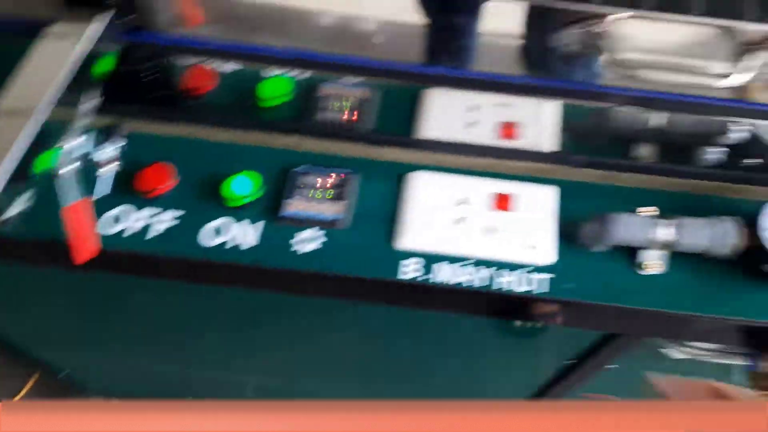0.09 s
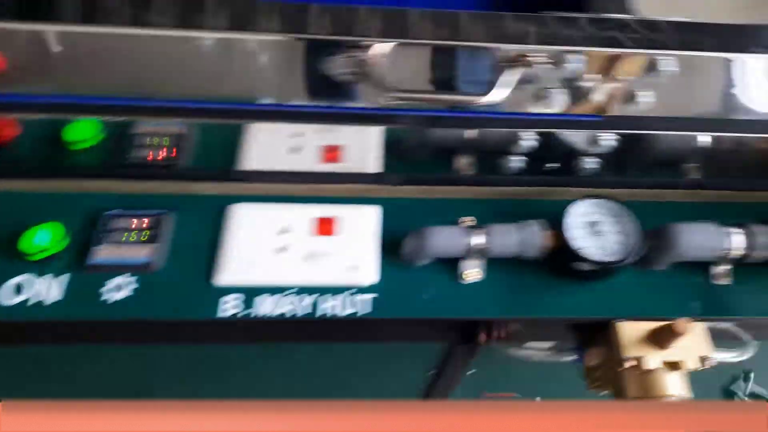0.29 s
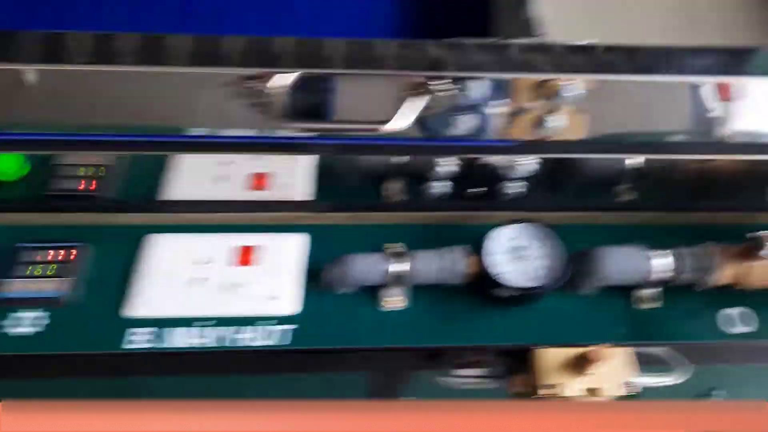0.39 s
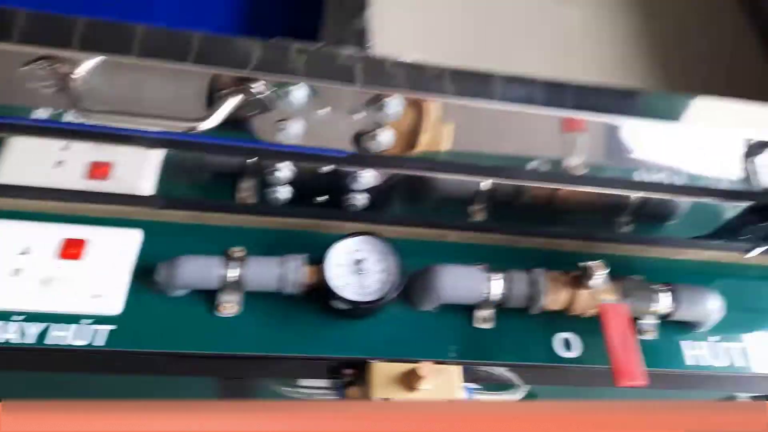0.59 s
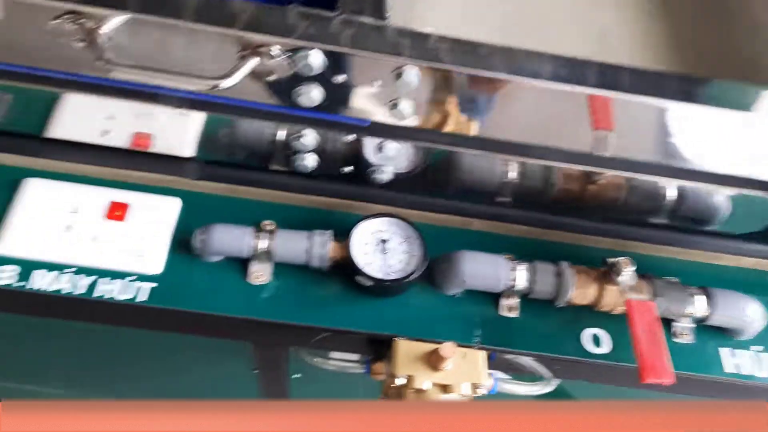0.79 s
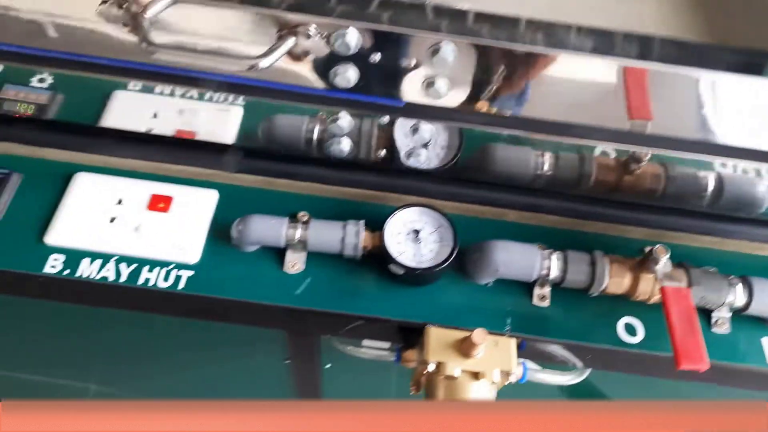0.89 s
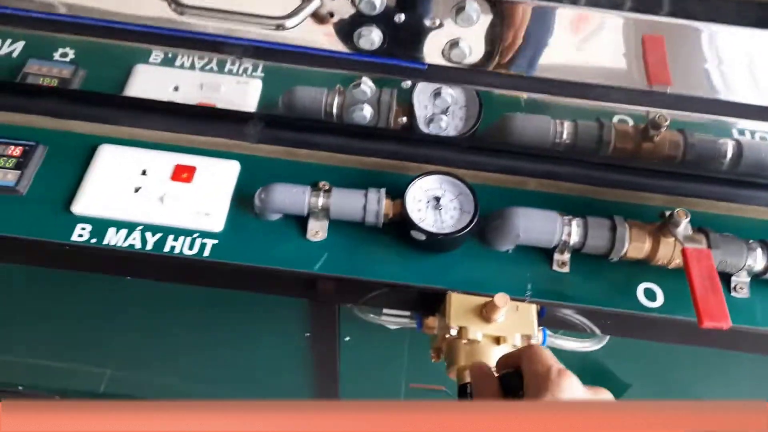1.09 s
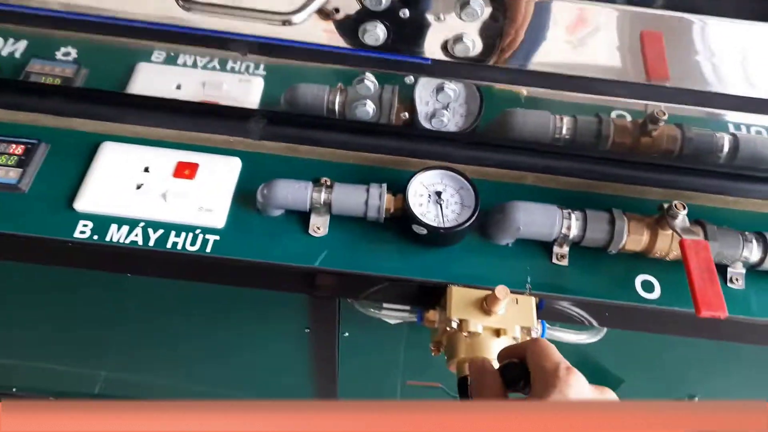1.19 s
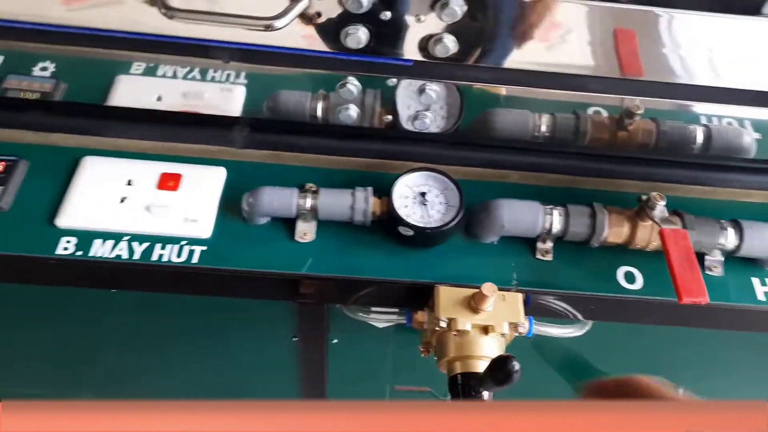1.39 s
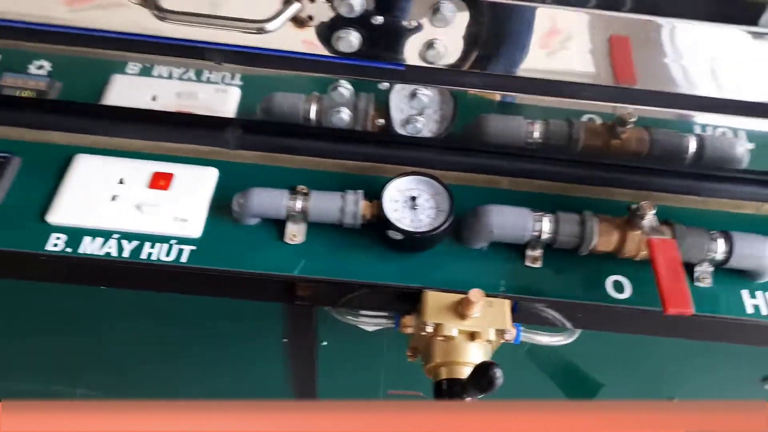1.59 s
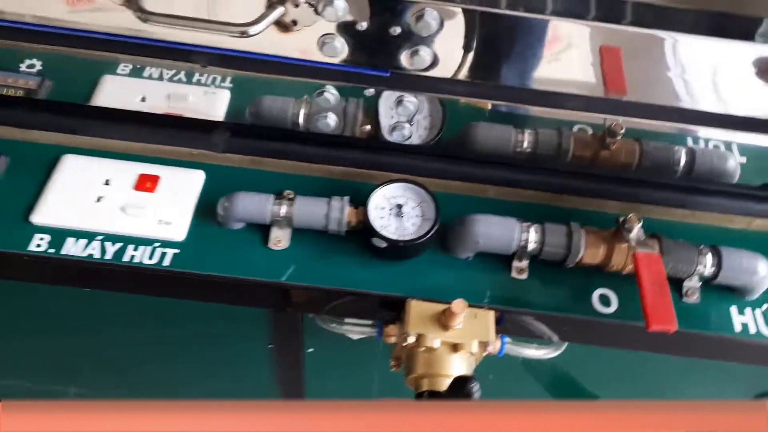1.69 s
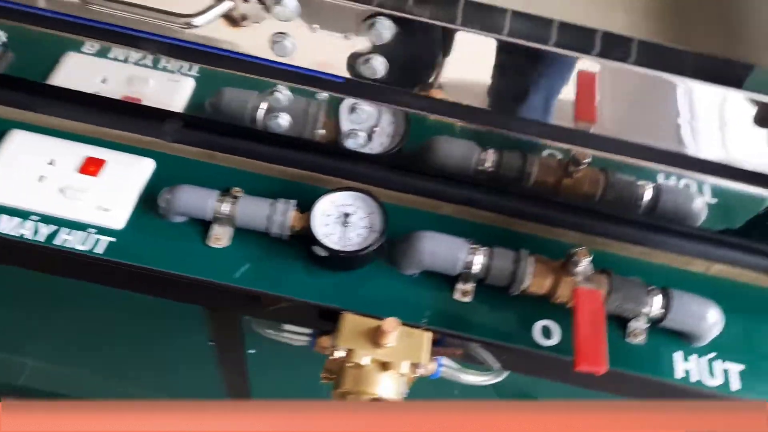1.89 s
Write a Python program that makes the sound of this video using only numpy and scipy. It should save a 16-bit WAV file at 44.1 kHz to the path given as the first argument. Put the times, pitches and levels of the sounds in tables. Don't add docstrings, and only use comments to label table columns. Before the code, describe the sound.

A compressed air blast from a brass valve in a workshop with distant machine rumble. A lever knocks at 0.2 s; air bursts out at 0.25 s with a sharp hiss, then a wide, gusty roar with low hollow howl buffeting the close stereo microphone. It sharpens and stops near 1.0 s. The hall rings away, with a click at 1.08, softer clicks around 1.37 and faint sleeve rustle around 1.6.

```python
import sys
import numpy as np
from scipy import signal
from scipy.fft import rfft, irfft, next_fast_len
from scipy.io import wavfile
from scipy.ndimage import uniform_filter1d

SR = 44100
rng = np.random.default_rng(int(sys.argv[2]) if len(sys.argv) > 2 else 0)


def int16_out(signal):
    q = np.round(np.clip(np.atleast_2d(signal).T, -1, 1) * 32767)
    wavfile.write(sys.argv[1], SR, q.astype(np.int16))


def voltage_ratio(level):
    return 10 ** (np.asarray(level, float) / 20)


N = 83790
TIME = np.arange(N) / SR
SIZE = next_fast_len(N)
OPEN_S, SHUT_S = 0.2478, 0.97


def rms_one(x):
    return x / np.sqrt(np.mean(x ** 2) + 1e-20)


def at_hz(points, hz):
    table = np.array(points)
    return np.interp(np.log(hz), np.log(table[:, 0]), table[:, 1])


def over_time(seconds, db):
    return voltage_ratio(np.interp(TIME, seconds, db, left=-120, right=-120))


def drift(rate_hz, channels):
    hold = 70
    r = np.exp(-2 * np.pi * rate_hz * hold / SR)
    chance = rng.standard_normal((channels, N // hold + 501))
    slow = signal.lfilter([1], [1, -2 * r, r * r], chance)[:, 500:]
    slow = slow / slow.std(axis=1, keepdims=True)
    return uniform_filter1d(np.repeat(slow, hold, axis=1), size=hold)[:, :N]


def bell(x, hz, width_hz, db):
    r, w = np.exp(-np.pi * width_hz / SR), 2 * np.pi * hz / SR
    peak = signal.lfilter([(1 - r * r) / 2, 0, (r * r - 1) / 2], [1, -2 * r * np.cos(w), r * r], x)
    return x + (voltage_ratio(db) - 1) * peak


OCTAVES = 120 * 2 ** np.arange(0, 8.)


def bands(colour, balance, likeness, shape=None):
    f = np.arange(SIZE // 2 + 1) * SR / SIZE + 1
    mid, side = rfft(rng.standard_normal((2, SIZE))) * voltage_ratio(at_hz(colour, f))
    alike = np.clip(at_hz(likeness, f), -.99, .99)
    lean = at_hz(balance, f) / 2
    pair = np.sqrt(1 + alike) * mid + np.sqrt(1 - alike) * side * [[1], [-1]]
    pair = pair * voltage_ratio([lean, -lean])
    pair = pair * SIZE / np.sqrt(np.sum(np.abs(pair) ** 2))
    if shape is None:
        return irfft(pair, SIZE)[:, :N]
    out = np.zeros((2, N))
    for hz in OCTAVES:
        low, high = hz / 2, hz * 2
        ends = [low < 70, 1, high > 25000]
        share = np.interp(np.log(f), np.log([low, hz, high]), ends)
        out += irfft(pair * share, SIZE)[:, :N] * shape(hz)
    return out


# frequency in Hz, level in dB per Hz.
SHOP_COLOUR = [(30, -7), (140, 1), (205, -18), (311, -5), (608, -16.5), (2260, -22.5), (11000, -46.5),
               (15500, -60)]
# frequency in Hz, left minus right in dB.
AIR_BALANCE = [(60, 2.7), (290, -0.5), (640, 3), (1900, 9.5), (4400, 2.5), (6500, 0.6), (8500, 5.5),
               (15000, 7.5)]
# frequency in Hz, likeness (1 is identical).
AIR_LIKENESS = [(60, 0.99), (240, 0.98), (950, 0.13), (3770, 0.027), (15000, 0.039)]


def shop():
    sway = lambda hz: voltage_ratio(1.7 * drift(8.5, channels=1))
    return voltage_ratio(-40.5) * bands(SHOP_COLOUR, AIR_BALANCE, AIR_LIKENESS, sway)


# middle in seconds, width in seconds, level in dB.
RUSTLES = [
    (.11, .04, -61.5),
    (1.47, 0.044, -65),
    (1.63, .06, -54),
    (1.72, 0.037, -60),
    (1.8, .03, -64),
]


def sleeve():
    swell = sum(voltage_ratio(db) * np.exp(-((TIME - s) / width) ** 2) for s, width, db in RUSTLES)
    cloth = [(3000, -13), (8000, 1), (13000, -4), (16000, -9.5)]   # Hz, dB per Hz
    return swell * bands(cloth, AIR_BALANCE, AIR_LIKENESS) * voltage_ratio(1.5 * drift(30, channels=1))


# start in seconds, level in dB, strongest frequency in Hz, fall in dB per octave away from it.
KNOCKS = [(.2050, -13.5, 2230, 8.5), (.2075, -13.5, 560, 11.5), (.2105, -19.5, 2540, 1.1),
          (.2135, -20.5, 386, 1.5), (0.222, -29, 428, 0), (1.0794, -14, 10000, 6), (1.082, -15, 3000, 5),
          (1.087, -24, 1700, 8), (1.088, -27, 350, 5), (1.358, -30, 1600, 12.0), (1.366, -32, 1454, 9),
          (1.369, -30, 3400, 11), (1.376, -38, 1500, 15.5), (1.39, -32, 1100, 8.0)]
# frequency in Hz, level in dB, seconds to fade by 60 dB.
BODY = [(300, -8.5, 0.04), (378.4, -6.5, 0.062), (460, -1.5, 0.076), (650, -13, .03), (810, -7.5, 0.046),
        (1000, -9.5, .03), (1190, -11.5, .03), (1400, -10.5, 0.029), (1575, -7.5, 0.023), (1922, -9, 0.09),
        (2200, -2, 0.005), (2584, -10.5, 0.014), (3400, -13, .006), (4580, -16, .004)]


def lever():
    crack_db, crack_s = -10.5, .03
    tail_db, tail_s = -1.5, 0.17
    at = np.array([int(row[0] * SR) for row in KNOCKS])
    luck_db = rng.normal(0, 1.5, (len(KNOCKS), len(BODY)))

    def strength(hz):
        return np.array([db - fall_db * abs(np.log2(hz / top_hz)) for s, db, top_hz, fall_db in KNOCKS])

    ring = np.zeros((2, N))
    for k, (hz, level_db, t60) in enumerate(BODY):
        clicks = np.full(N, 1e-18)
        clicks[at] += voltage_ratio(strength(hz) + level_db + luck_db[:, k])
        r, w = voltage_ratio(-60 / (t60 * SR)), 2 * np.pi * hz / SR
        lean = at_hz(AIR_BALANCE, hz) / 2
        tone = signal.lfilter([0, np.sin(w)], [1, -2 * r * np.cos(w), r * r], clicks)
        ring += (-1) ** k * tone * voltage_ratio([[lean], [-lean]])

    lag = TIME[:SR // 3]
    scatter = rms_one(rng.standard_normal((2, len(lag))))
    scatter = scatter * voltage_ratio(tail_db - 27 - 60 * lag / tail_s) * (lag > .002)

    clicks = np.full(N, 1e-18)
    clicks[at] += voltage_ratio(strength(9000) + crack_db)
    crack = signal.lfilter([1], [1, -voltage_ratio(-60 / (crack_s * SR))], clicks)
    crack_colour = [(2000, -16.5), (4500, -2.5), (9000, -6), (15000, -7.5)]   # Hz, dB per Hz
    crack = crack * bands(crack_colour, AIR_BALANCE, AIR_LIKENESS)
    return ring + crack + signal.fftconvolve(ring, scatter, axes=1)[:, :N]


# time in seconds, level in
# dB.
NOZZLE = [
    (.236, -46),
    (.2422, -31),
    (.2436, -14.5),
    (.256, -8),
    (.27, -17),
    (.9, -19.5),
    (.966, 0.5),
    (.984, -4),
    (1.01, -47),
]
# frequency in Hz, level in dB per Hz.
NOZZLE_COLOUR = [(1500, -25), (4000, -6.5), (5800, 3), (6700, -8.5), (7500, -3), (9500, -5), (14000, -18),
                 (16000, -12)]
# frequency in Hz, left minus right in dB.
JET_BALANCE = [(60, -5), (380, -1.5), (2380, 0.5), (15000, 0)]


def nozzle():
    hiss = bands(NOZZLE_COLOUR, JET_BALANCE, [(100, 0.0031), (9000, 0.0053)])
    return hiss * voltage_ratio(0.59 * drift(36, channels=1)) * over_time(*np.transpose(NOZZLE))


# time in seconds, turbulence in dB, cavity howl in dB.
BLAST = [
    (.243, -29, -26),
    (.26, 0, -12),
    (.33, 5.5, -7),
    (.475, 6.5, -2),
    (.6, 3.5, -10),
    (.9, 4, -6),
    (0.949, 2.5, 2),
    (0.969, 0, -9),
    (1.0, -26, -44),
]
# frequency in Hz, level in dB per Hz.
BLAST_COLOUR = [(20, -35.5), (60, -3.5), (330, -5), (616, -4.5), (5900, -12.5), (8900, -16.5), (13500, -10),
                (16000, -15)]
# frequency in Hz, width in Hz, change in dB.
PORT_NOTCH = [(8550, 2000, -14), (10080, 2800, -12.5)]
SKEW = [
    [.06],
    [-.04],
]


def blast():
    seconds, db, howl_db = np.transpose(BLAST)
    gust = drift(4.16, channels=2)

    def lumpy(hz):
        depth = np.clip(700 / hz, .3, 1)
        return voltage_ratio(depth * (1.7 * gust + 2.4 * drift(25, channels=2)))

    rush = bands(BLAST_COLOUR, JET_BALANCE, [(100, 0.0008), (9000, 0.003)], lumpy)
    rush = rush - np.array(SKEW) * (rush ** 2 - 1)
    rush = rms_one(bell(rush, *PORT_NOTCH[0]))

    cavity_hz, cavity_width_hz = 311, 120
    howl = rng.standard_normal((2, N))
    for _ in range(2):
        howl = bell(howl, cavity_hz, cavity_width_hz, 20) - howl
    howl = rms_one(howl) * voltage_ratio(0.87 * drift(2.8, channels=2) + [[-.7], [.7]])
    return rush * over_time(seconds, db) + howl * over_time(seconds, howl_db)


# frequency in Hz, level in dB per Hz.
HALL_COLOUR = [(300, -13), (856, -14), (1930, -3.5), (2840, -4.5), (5800, 0), (9000, -5), (13500, -3),
               (16000, -8.5)]
# frequency in Hz, seconds to fade by 60 dB.
HALL_T60 = [(300, 1), (1500, 1), (7500, 0.73), (15000, .5)]


def hall():
    valve_open = 1. * (TIME > OPEN_S) * (TIME < SHUT_S)

    def fill(hz):
        r = voltage_ratio(-120 / (at_hz(HALL_T60, hz) * SR))
        return np.sqrt(signal.lfilter([1 - r], [1, -r], valve_open))

    return voltage_ratio(-11) * bands(HALL_COLOUR, AIR_BALANCE, AIR_LIKENESS, fill)


def scene():
    return shop() + sleeve() + lever() + nozzle() + blast() + hall()


def band_limit(x):
    return signal.sosfilt(signal.butter(12, 16790, fs=SR, output="sos"), x)


def record(dry):
    duck_db, duck_s, creep_db_per_s = -18.5, 0.01, -1
    headroom, cutoff_hz = 1.3, 15680
    since_open = np.maximum(TIME - OPEN_S, 0)
    since_shut = np.maximum(TIME - SHUT_S, 0)
    gain_db = duck_db * (1 - np.exp(-since_open / duck_s)) + creep_db_per_s * since_shut
    ports = np.array([dry[0], bell(dry[1], *PORT_NOTCH[1])]) * voltage_ratio(gain_db)
    ports = headroom * np.tanh(ports / headroom)
    low_pass = signal.ellip(16, .5, 90, cutoff_hz, fs=SR, output="sos")
    return band_limit(signal.sosfilt(low_pass, ports))


dry = scene()
out = record(dry)
int16_out(out)
```